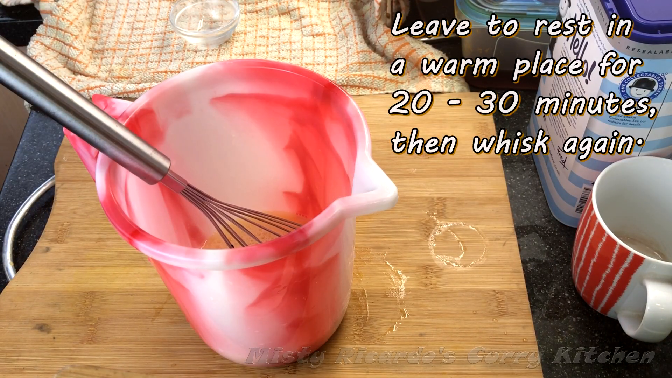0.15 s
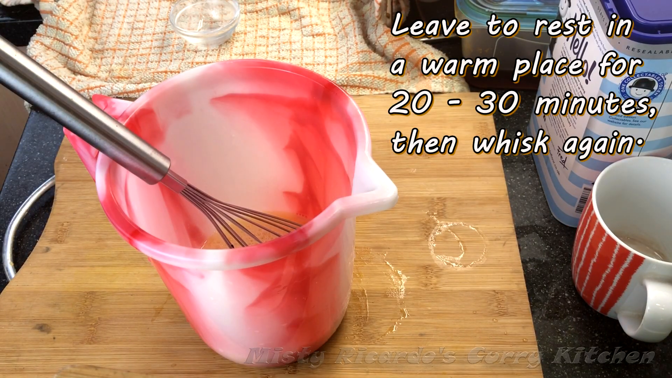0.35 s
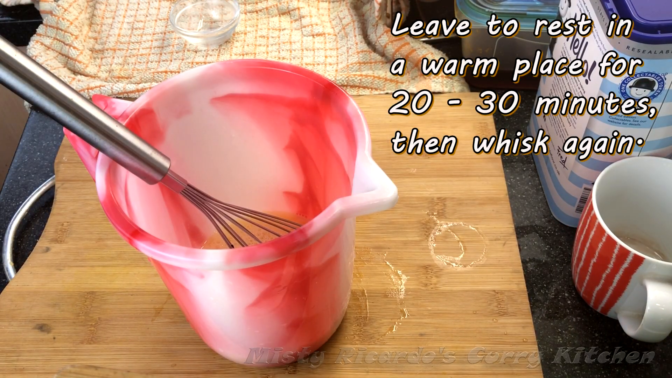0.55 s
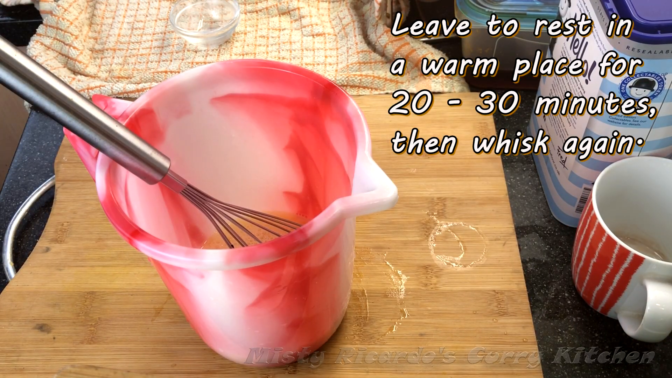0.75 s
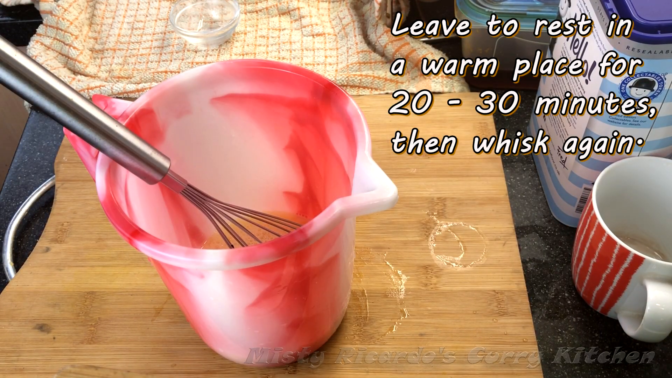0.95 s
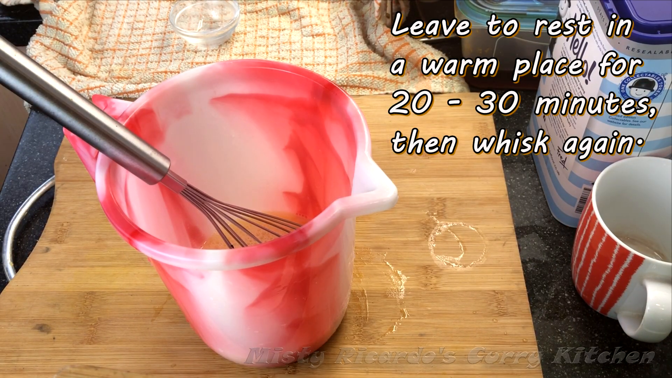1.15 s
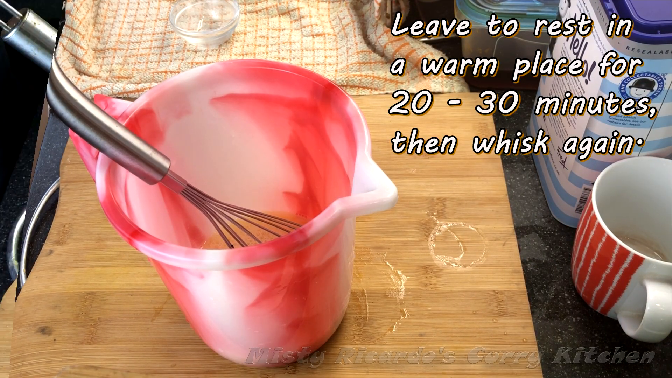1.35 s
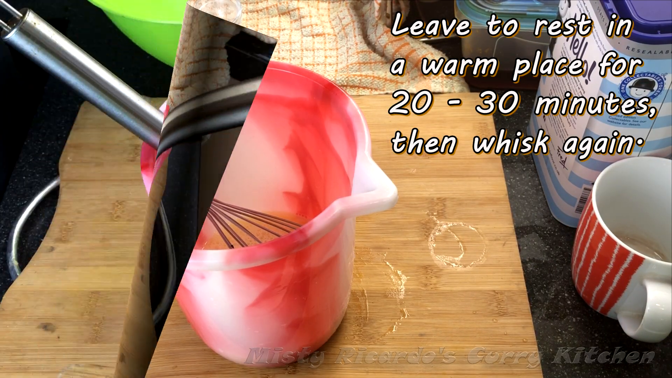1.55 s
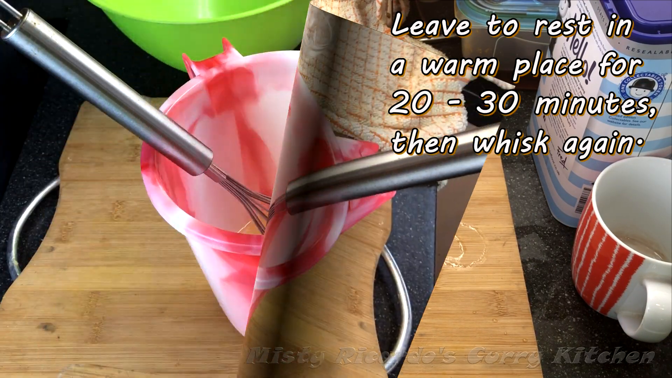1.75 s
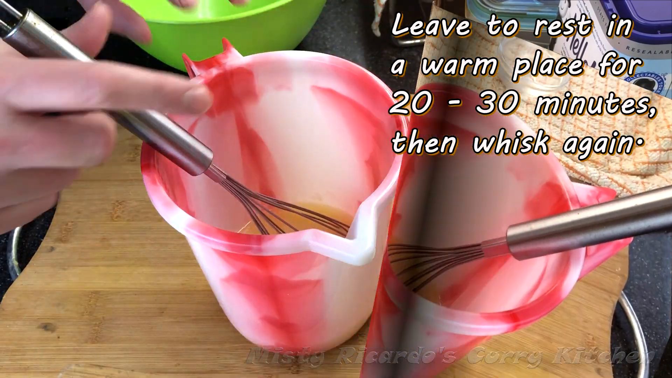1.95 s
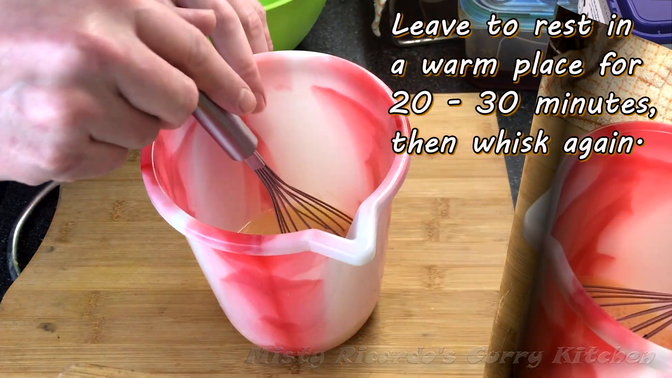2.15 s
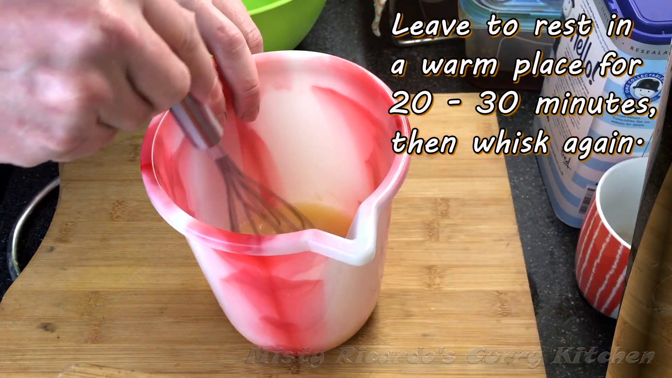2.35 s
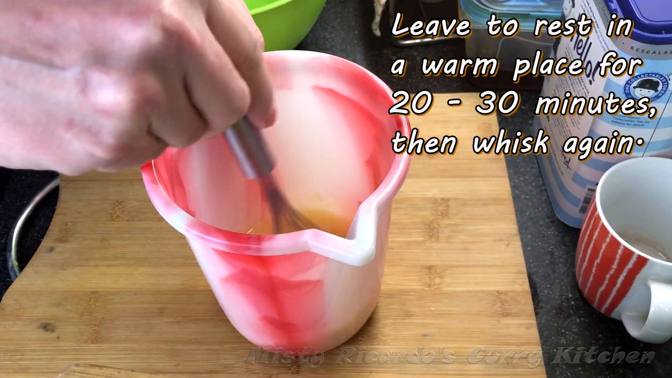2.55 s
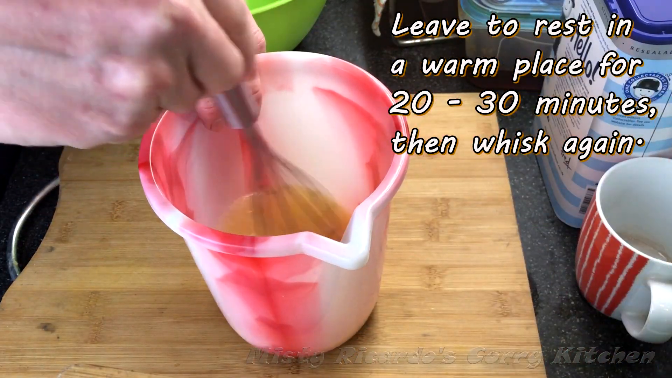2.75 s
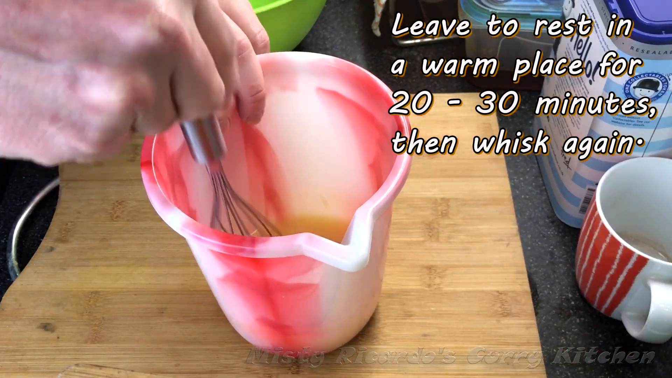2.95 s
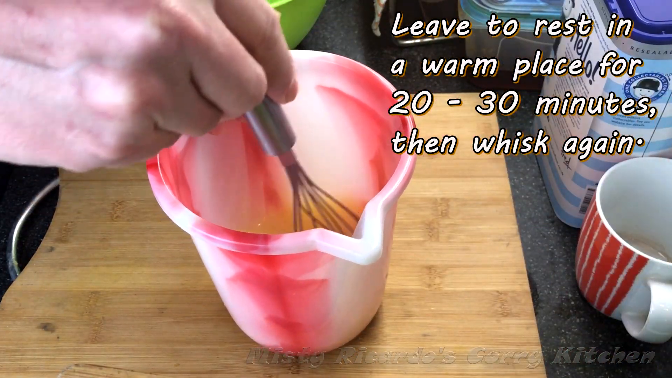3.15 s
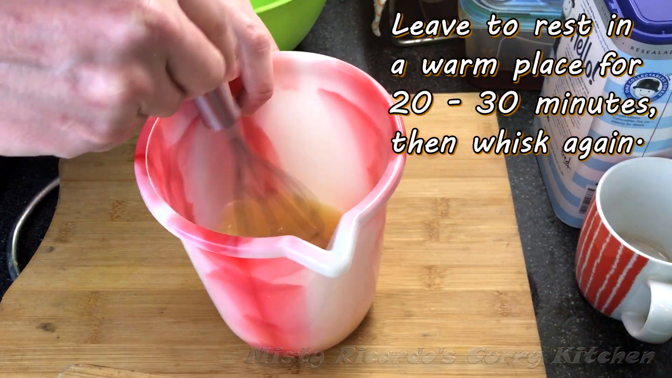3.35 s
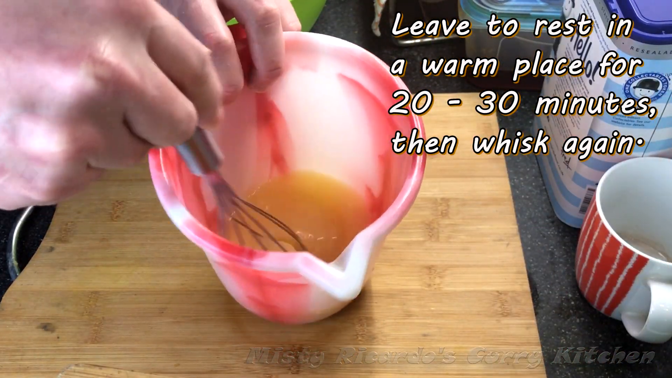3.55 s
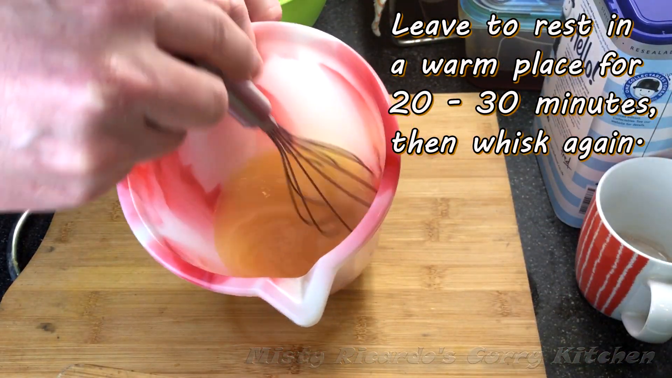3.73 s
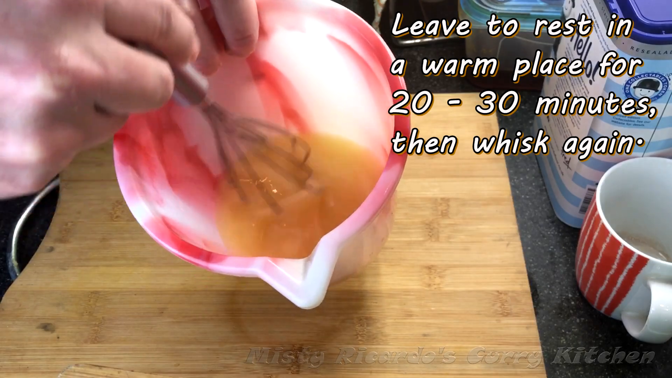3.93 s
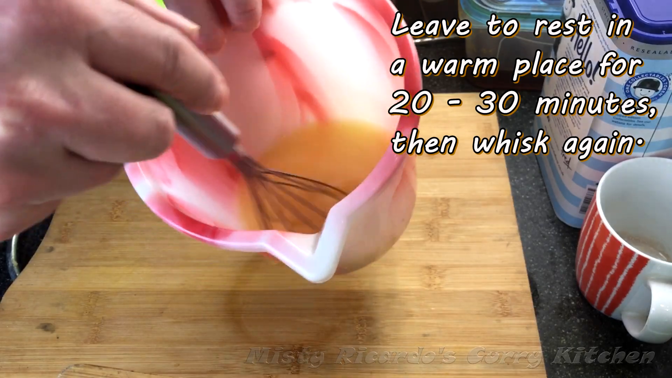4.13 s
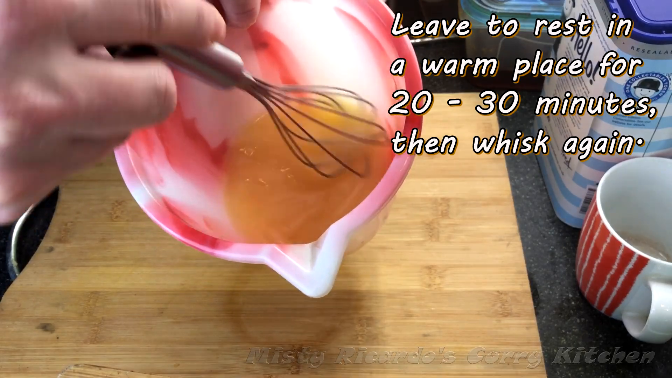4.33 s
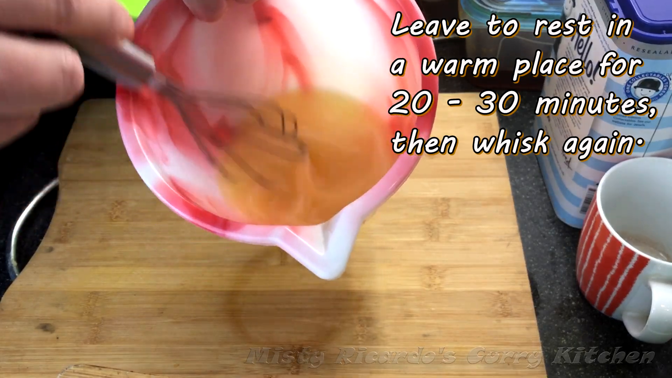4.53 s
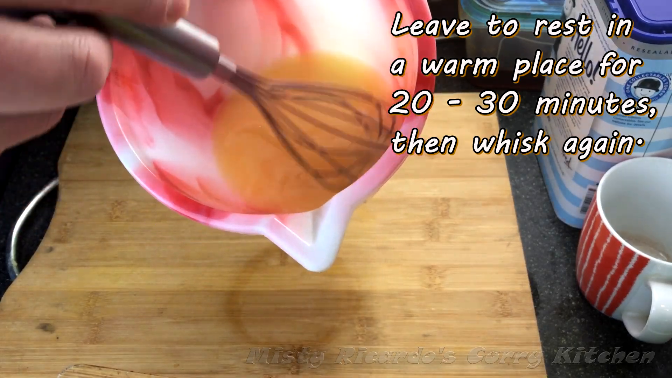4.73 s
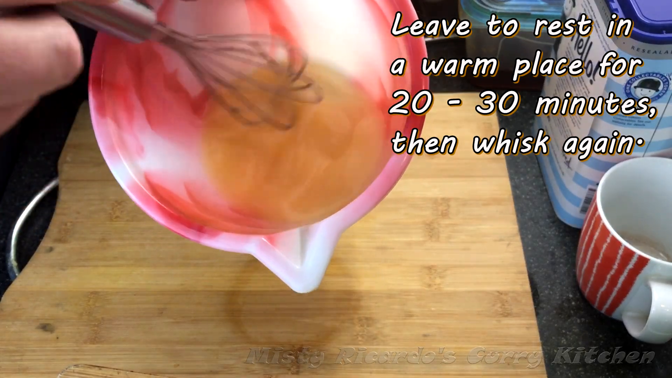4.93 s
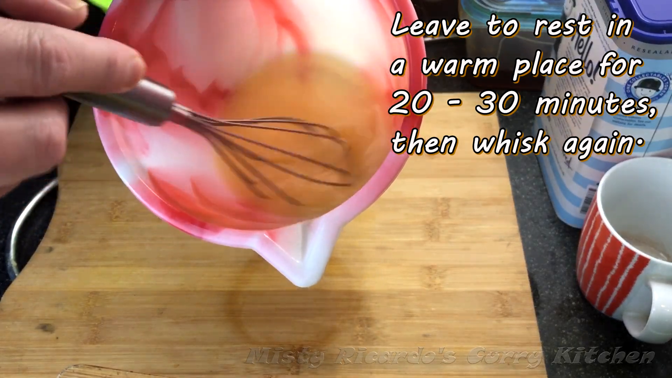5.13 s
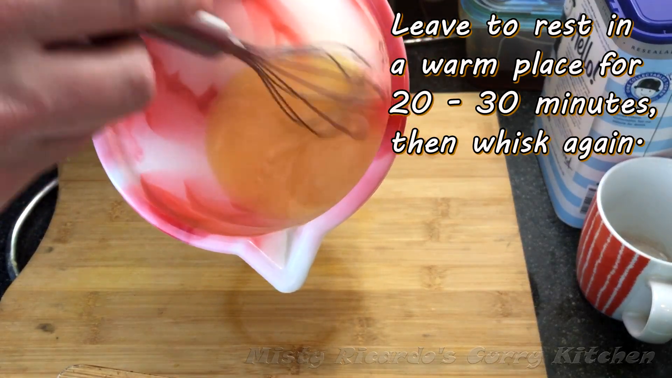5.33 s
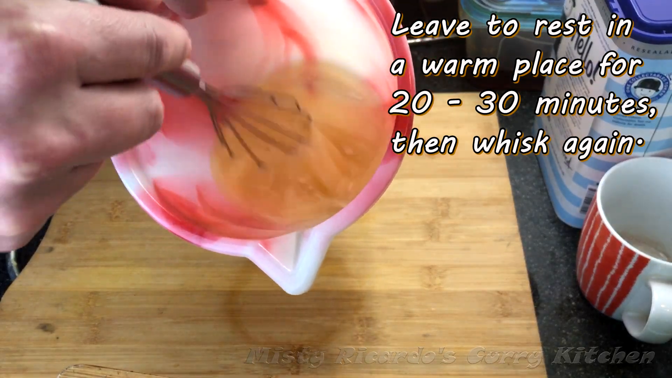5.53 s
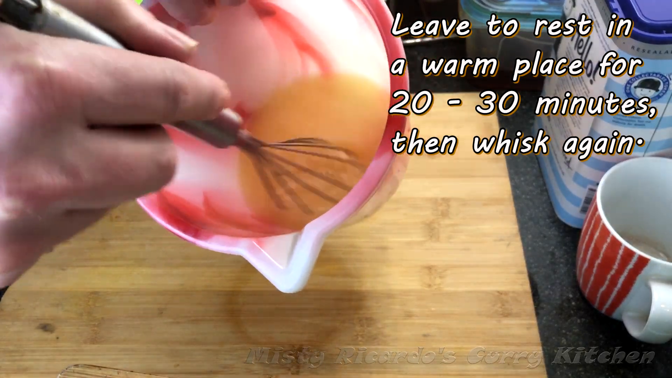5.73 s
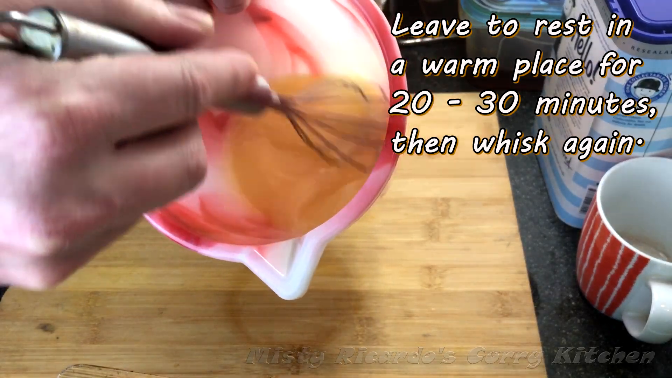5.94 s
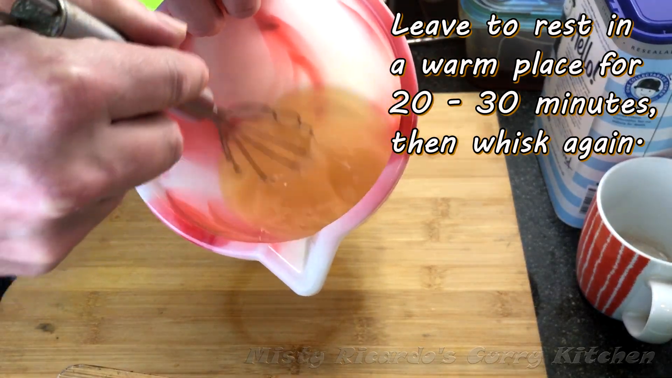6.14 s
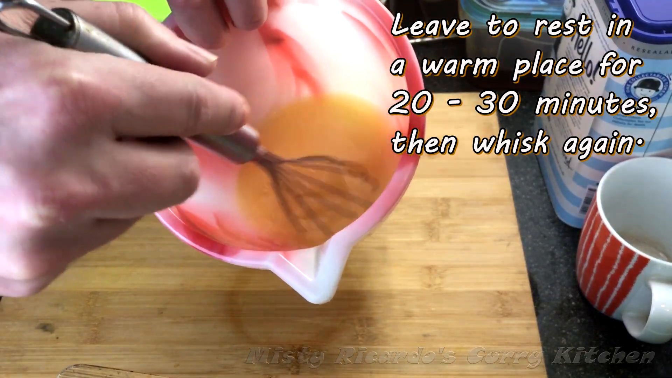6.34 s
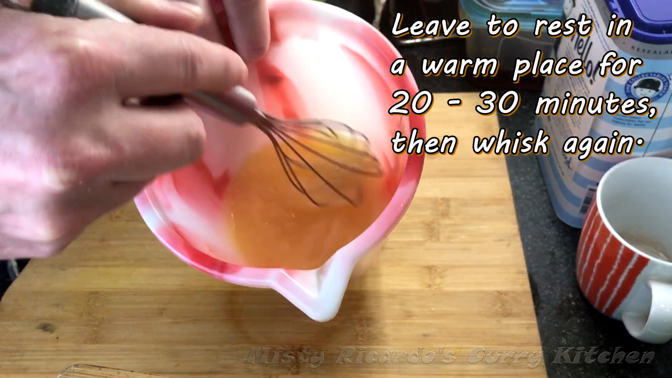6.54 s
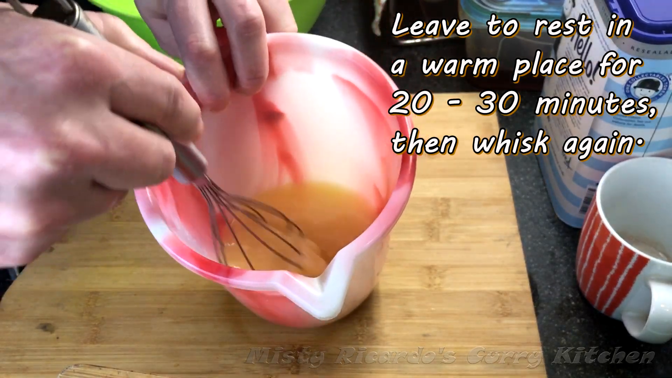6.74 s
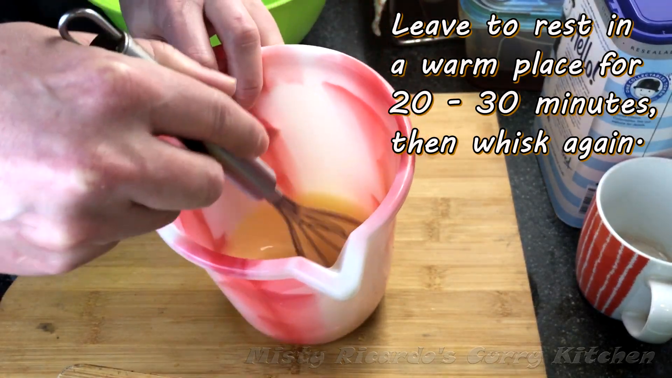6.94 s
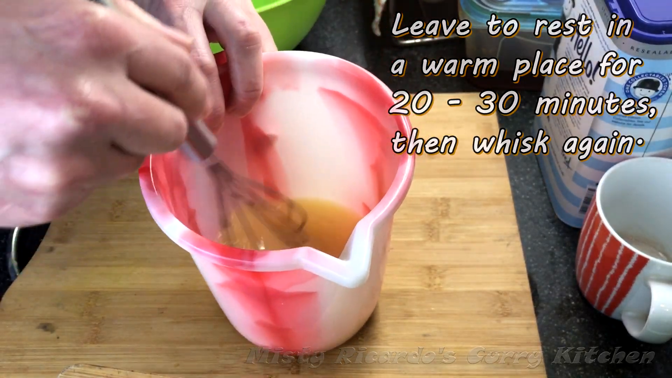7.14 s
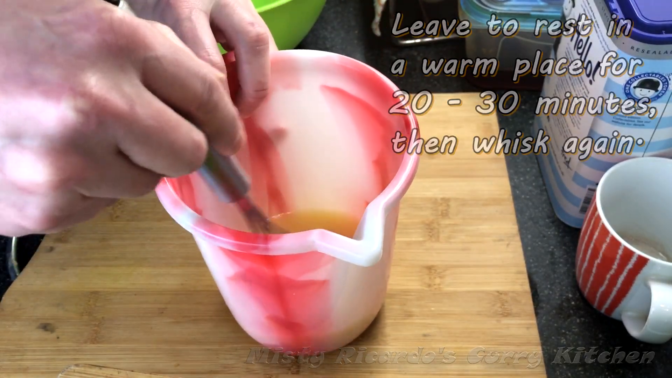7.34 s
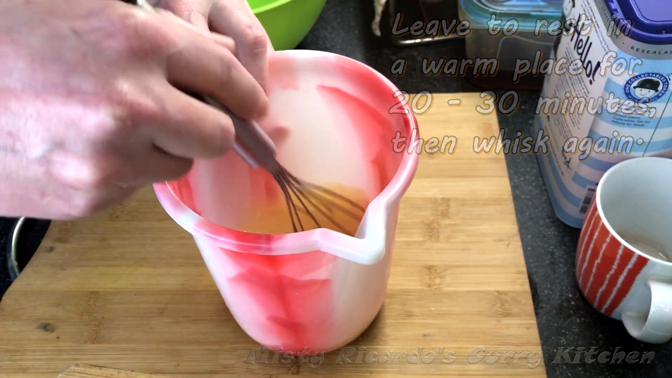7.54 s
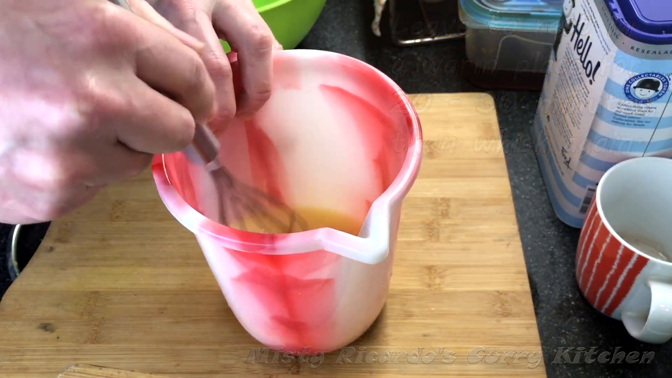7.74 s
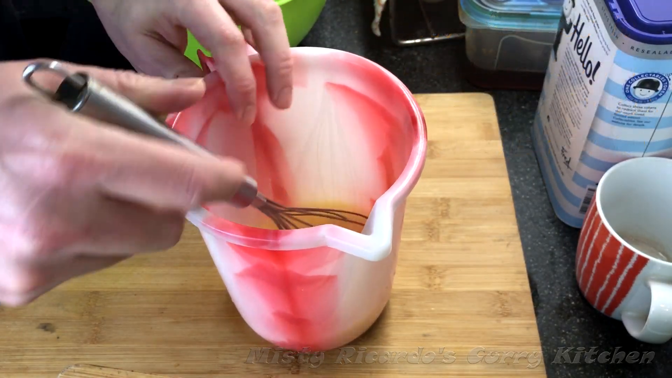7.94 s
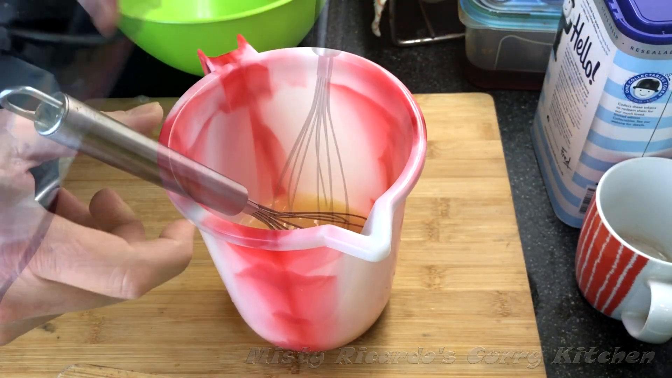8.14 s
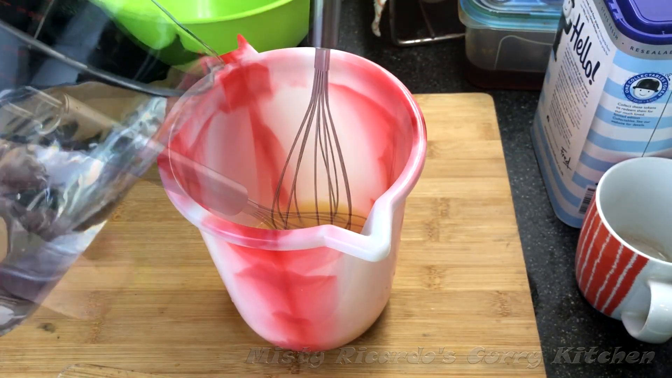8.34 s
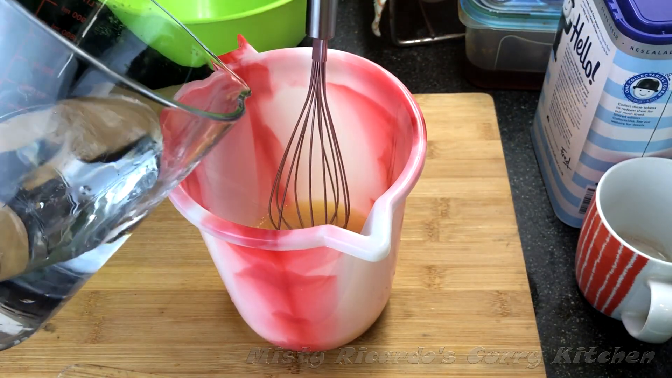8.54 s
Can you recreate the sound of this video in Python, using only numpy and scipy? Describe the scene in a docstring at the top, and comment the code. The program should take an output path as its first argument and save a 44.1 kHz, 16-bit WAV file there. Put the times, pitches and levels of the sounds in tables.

```python
"""A steel whisk beats a little liquid in a plastic jug: wires clack and chatter on the wall as noise bursts,
then swish on as gritty noise, and both set the jug's resonances ringing. Bubbles froth and gulp.
The tilted jug bumps back onto a wooden board and the whisk's handle drops on the rim, as damped modes.
The room hums softly in narrow noise, and echoes in decaying noise tails."""
import sys
import numpy as np
from scipy import signal
from scipy.fft import rfft, irfft, next_fast_len
from scipy.io import wavfile
from scipy.ndimage import uniform_filter1d, map_coordinates

SR = 44100
rng = np.random.default_rng(int(sys.argv[2]) if len(sys.argv) > 2 else 0)


def log_audio(samples):
    """Write samples as a 16-bit WAV file to the path given in sys.argv[1]."""
    # one column per channel
    frames = np.atleast_2d(samples).T
    # limit to full scale, then quantise
    limited = np.clip(frames, -1, 1)
    pcm = np.round(limited * 32767).astype(np.int16)
    wavfile.write(sys.argv[1], SR, pcm)


N = 378378

# Colour of wire on plastic, also lent to the rustle. Each row: frequency in Hz, relative density in dB per Hz.
WIRE_COLOUR = [(45, -29.5), (150, -21), (350, -28), (750, -7.5), (1100, -10), (1450, -5.5), (2200, -1),
               (3000, 2), (4300, 1.5), (5200, -5.5), (7200, -9.5), (9000, -16), (12000, -21.5),
               (15500, -25.5)]
# The whisk's hits on the wall, heavy ones and lighter grazes; the last row is a faint separate tick after
# the handle has dropped. Each row: start in seconds, mean level of its wires in dB, sweep from first to
# last wire in seconds, swell over the sweep in dB, tilt in dB per octave.
BLOWS = [(2.073, -68.5, 0, 11, -6), (2.107, -75, 0.0013, 6, -6), (2.392, -55, 0.016, 7, 1),
         (2.481, -45.5, 0, 0, 2), (2.501, -40.5, 0.0019, 0, -1), (2.636, -51, 0.013, -6, -4),
         (2.676, -41.5, 0, 0, -2.5), (2.731, -37, 0.031, 3.5, -3), (2.849, -38, 0.0048, 0, -2),
         (2.949, -43.5, 0, 0, -2), (2.996, -43, 0.016, 0, -5.5), (3.032, -34.5, .025, 6.5, 1),
         (3.131, -32, 0.0052, 11.5, 1.5), (3.179, -44.5, 0.00036, -8, -2.5), (3.326, -36.5, 0.0085, 8, 1),
         (3.354, -40.5, 0.0097, 2, -4), (3.381, -34, 0.0028, -7, 0.5), (3.458, -33.5, 0.0081, -6, -1),
         (3.6, -49, 0, 6, 2), (3.67, -32.5, 0.008, 3.5, -3.5), (3.762, -30.5, 0.0058, -2, 5),
         (3.864, -40, 0, 0, -3), (3.898, -47, 0.0022, 2, -5), (3.976, -31, 0.024, 3.5, -0.5),
         (4.064, -34.5, 0.009, 6, 2.5), (4.166, -42, 0, 0, -1.5), (4.217, -38, 0, 0, -8),
         (4.289, -40, 0.0023, 13, -3), (4.314, -32, 0.0073, -1, 2), (4.373, -35, 0.014, 1, 3.5),
         (4.521, -49, 0, 0, -2.5), (4.6, -32.5, 0.043, 1.5, 0), (4.704, -36, 0.021, 1, 5),
         (4.798, -41.5, 0.021, -2.5, 2), (4.895, -42, 0.0035, -4, -5.5), (4.945, -31, 0.035, 0, 0),
         (5.047, -37, 0.018, -5.5, 2), (5.129, -50, 0.0022, -3, 7), (5.177, -42.5, 0, 0, -5),
         (5.222, -51.5, 0.00052, 0, -11), (5.278, -30, 0.031, 1, 1.5), (5.375, -32, 0.0053, 9.5, 3),
         (5.428, -40.5, 0.0011, -4, -0.5), (5.469, -39.5, 0, 0, -5.5), (5.576, -42, 0.0078, -2, -6),
         (5.643, -24.5, 0, 0, 3), (5.694, -30.5, 0.0042, 8.5, 3), (5.739, -36.5, 0, 0, -1),
         (5.913, -38.5, 0, 0, -1.5), (5.934, -33.5, 0, 0, -0.5), (5.991, -27.5, 0.0086, -2, 2.5),
         (6.19, -49.5, 0, 0, -6.5), (6.254, -27.5, 0.00026, -7, 3.5), (6.308, -28.5, 0.0068, 2, 2.5),
         (6.527, -47.5, 0.00031, 3, 0), (6.558, -30, 0, 2.5, 2), (6.614, -31, 0.0073, 4.5, 8.5),
         (6.853, -31, 0.014, 5.5, 0.5), (6.942, -38.5, 0.0083, 9.5, -0.5), (7.183, -43.5, .014, 7, -2.5),
         (7.221, -35, 0.00041, 0, 3), (7.286, -39, 0.00027, -9.5, -3.5), (7.504, -39.5, 0.037, 9.5, -1.5),
         (7.613, -37, 0.0048, 7, -1), (7.816, -40, 0.017, 3, -4.5), (7.899, -38.5, .013, 8, -2.5),
         (8.435, -66.5, 0, -3.5, -3)]


def amp(db):
    """Decibels to amplitude."""
    return 10 ** (np.asarray(db) / 20)


def unit(x):
    """x scaled to an rms of 1."""
    return x / np.sqrt(np.mean(x ** 2) + 1e-20)


def along(points, hz):
    """Values between (Hz, value) points, on a log frequency axis."""
    point_hz, values = np.transpose(points)
    return np.interp(np.log(hz + 1), np.log(point_hz + 1), values)


def curve(rows):
    """(seconds, value) rows as one value per sample."""
    return np.interp(np.arange(N) / SR, *np.transpose(rows))


def wobble(rate):
    """A smooth random curve with rate knots a second."""
    knots = rng.standard_normal(int(N * rate / SR) + 4)
    return map_coordinates(knots, [np.arange(N) * rate / SR])


def fade(t, t60):
    """Exponential decay, 60 dB down after t60 seconds."""
    return np.exp(-np.log(1000) * np.minimum(t / t60, 10))


def add(track, s, sound):
    """Mix a sound into the track at s seconds."""
    part = track[round(s * SR):][:len(sound)]
    part += sound[:len(part)]


def filtered(x, response):
    """x times a response of frequency, padded so that rings can die out."""
    size = next_fast_len(N + SR // 2)
    return irfft(rfft(x, size) * response(np.fft.rfftfreq(size, 1 / SR)), size)[:N]


def coloured(x, points, tilt=0, ripple_db=0, size=1024):
    """x through a minimum-phase colour: treble tilt in dB per octave, plus a ripple of random broad modes."""
    hz = np.fft.rfftfreq(size, 1 / SR)
    ripple = map_coordinates(rng.standard_normal(size // 8), [np.sqrt(hz) / 3])
    ripple = np.minimum(ripple, 1.5) / np.hypot(1, hz / 6000)  # peaks limited, flatter in the treble
    slope = tilt * np.log2(np.clip(hz, 2000, 10000) / 2000)
    gain = unit(amp(along(points, hz) + slope + ripple_db * ripple))
    cepstrum = irfft(np.log(gain + 1e-6))
    cepstrum[1:size // 2] *= 2  # folding the cepstrum makes the filter causal
    cepstrum[size // 2 + 1:] = 0
    impulse = irfft(np.exp(rfft(cepstrum)))
    return signal.fftconvolve(x, impulse)[:len(x)]


def resonate(x, modes):
    """x through parallel resonances of (Hz, width in Hz, peak gain in dB)."""
    def response(f):
        return sum(amp(db) * 1j * f * width / (hz * hz - f * f + 1j * f * width) for hz, width, db in modes)
    return filtered(x, response)


def background():
    """Room air, a fluttering low appliance hum of narrow noise, and a little rustle of handling."""
    # Spectrum of the air. Each row: frequency in Hz, relative density in dB per Hz.
    air_colour = [(18, -89), (30, -39.5), (90, -13.5), (130, -15.5), (164, -3), (270, -29.5), (315, -18.5),
                  (350, -26.5), (532, -28.5), (622, -30), (787, -31), (1170, -26), (1910, -39),
                  (3500, -43.8), (15500, -54)]
    # Soft rustle of handling. Each row: time in seconds, level in dB.
    rustle_level = [(2.0, -105), (2.17, -76.5), (2.4, -79), (8.2, -77), (8.58, -96)]
    air = unit(filtered(rng.standard_normal(N), lambda hz: amp(along(air_colour, hz))))
    hum = resonate(rng.standard_normal(N), [(158.6, 4.7, 0)])
    hum = unit(resonate(hum, [(161.4, 3.7, 0)]))  # two narrow bands in series
    rustle = amp(curve(rustle_level)) * coloured(rng.standard_normal(N), WIRE_COLOUR, tilt=-2.5)
    return amp(-68.0) * air + amp(-76) * hum + rustle


def grains(size, rate, smooth):
    """Tiny random impacts, rate a second, over a share of smooth noise; rms 1."""
    impacts = rng.standard_normal(size) * (rng.random(size) < rate / SR)
    return unit(unit(impacts) + smooth * rng.standard_normal(size))


def volley(t, delays, gains, t60, attack):
    """Joint envelope of several impacts that rise and die alike, summed in power."""
    age = np.maximum(t - delays[:, None], 0)
    shapes = fade(age, t60) * (1 - np.exp(-age / attack))
    return np.linalg.norm(gains[:, None] * shapes, axis=0)


def strikes(blows, count=6):
    """Wires land one after another, tick and chatter; each blow has its own colour. Gives plain and coloured."""
    wire_gap_s = 0.016  # widest nominal gap between wires, until all count wires are in use
    wire_slip_s, wire_scatter_db = 0.00077, 1.24  # wires unevenly spaced and unevenly stiff
    chatter_db, chatter_t60_s = -16, 0.055  # each wire buzzes on the wall
    tick_db, tick_t60_s = -15.5, 0.0024  # after a hard first touch
    force, clack, t = np.zeros(N), np.zeros(N), np.arange(SR // 10) / SR
    for s, db, sweep, swell_db, tilt in blows:
        wires = min(1 + int(np.ceil(abs(sweep) / wire_gap_s)), count)
        place = np.linspace(0, 1, wires)
        slip, stiffness = rng.standard_normal((2, count))[:, :wires]
        delays = place * (abs(sweep) + wire_slip_s * slip)
        wire_db = swell_db * place + wire_scatter_db * stiffness
        gains = amp(db + wire_db - wire_db.mean())

        lumps = amp(2.07 * map_coordinates(rng.standard_normal(len(t) // 100), [t * 350]))
        chatter_shape = volley(t, delays, gains, chatter_t60_s, attack=0.0018)
        chatter = grains(len(t), rate=2500, smooth=0.72) * lumps * chatter_shape
        tick = rng.standard_normal(len(t)) * volley(t, delays, gains, tick_t60_s, attack=0.00005)
        snap = tick - 0.45 * np.roll(tick, 1)  # hard steel favours the treble
        blow = np.linalg.norm(gains) * (amp(chatter_db) * unit(chatter) + amp(tick_db) * unit(snap))
        add(force, s, blow)
        add(clack, s, coloured(blow, WIRE_COLOUR, tilt, ripple_db=4.5))
    return force, clack


def drag_strength():
    """How hard the wires drag: stirring plus a dying swish after every blow, summed in power."""
    # Wires stirring along the bottom, apart from the blows. Each row: time in seconds, level in dB.
    stir_level = [(2.1, -110), (2.27, -67.5), (2.4, -58), (2.75, -66), (3.0, -74), (3.3, -69.5), (3.7, -60),
                  (4.2, -64.5), (4.55, -69), (5.1, -62), (5.3, -75.5), (6.82, -90.5), (7.04, -62.5),
                  (7.4, -68), (7.7, -56.5), (8.0, -81), (8.15, -110)]
    firm_db, swish_db = -29, -55  # a blow of firm_db swishes at swish_db; softer blows swish less
    rise_s, t60_s = 0.016, 0.54
    power, t = amp(curve(stir_level)) ** 2, np.arange(SR // 2) / SR
    swish = fade(t, t60_s) * (1 - np.exp(-t / rise_s))
    for s, db, *_ in BLOWS:
        add(power, s, (amp(swish_db + db - firm_db) * swish) ** 2)
    return np.sqrt(power)


def strays(strength, count=64):
    """Light flicks of single wires at random moments, as strong as the drag allows; rows like BLOWS."""
    # Start and end of the whisking, in seconds.
    whisking_s = (2.28, 7.95)
    shares = (np.arange(count) + rng.random(count)) / count  # one flick in each equal slot
    times = np.interp(shares, [0, 1], whisking_s)
    levels = 20 * np.log10(strength[(times * SR).astype(int)]) + 7.5  # dB over the drag
    return [(s, db, 0, 0, -1.5) for s, db in zip(times, levels)]


def patchy(x, depth_db):
    """x with narrow resonances that come and go; rms 1."""
    z = signal.stft(x, nperseg=512)[2]
    field = uniform_filter1d(rng.standard_normal(z.shape), size=4, axis=0)  # across frequency
    field = uniform_filter1d(field, size=8, axis=1)  # across time
    return unit(signal.istft(z * amp(depth_db * unit(field)), nperseg=512)[1][:N])


def bubble(hz):
    """An air pocket rings with a rising pitch, 60 dB down after about fifteen cycles."""
    t = np.arange(int(SR * 15 / hz)) / SR
    return np.sin(2 * np.pi * hz * (t + 0.74 * t ** 2)) * fade(t, 15 / hz) * (1 - np.exp(-t * hz))


def froth(count=1300):
    """Small bubbles of many sizes beaten into the liquid; rms 1."""
    out = np.zeros(N)
    for s, pitch, size in rng.random((count, 3)):
        add(out, s * N / SR, amp(10 * size) * bubble(280 * 9 ** pitch))
    return unit(out)


def whisk():
    """Strikes and the gritty drag of the wires both set the jug ringing."""
    # The jug's wall and cavity. Each row: frequency in Hz, width in Hz, relative gain in dB.
    jug_modes = [(319.8, 9.6, 7.5), (460.3, 20, 0.5), (487, 21.4, 2), (660, 12, -5.5), (1460, 37, -20.5),
                 (2100, 58, 1.5), (2751, 37, 4), (3170, 42, -1.5), (4340, 30, -5.5)]
    # Cross mode of the air in the jug. Each row: frequency in Hz, width in Hz, relative gain in dB.
    cavity_modes = [(1718, 48.5, 0.5)]
    # The cross mode is strongest while the jug stands upright. Each row: time in seconds, drive in dB.
    upright_drive = [(2.3, 19.5), (4.1, 16.5), (4.7, 4), (6.2, 12.5), (6.9, 18), (7.9, 20)]
    # Broad, hollow resonance of the lifted, tilted jug. Each row: frequency in Hz, width in Hz, gain in dB.
    hollow_modes = [(1180, 300, 1.5)]
    # How far the jug is tilted. Each row: time in seconds, share from 0 to 1.
    tilted_share = [(4.1, 0), (4.6, 0.6), (6.4, 1), (6.9, 0.1)]
    judder_db, judder_per_s = 5, 64  # the dragging wires catch and slip: depth, random knots a second
    froth_db = -9.5  # relative to the drag strength

    strength = drag_strength()
    force, clack = strikes(BLOWS + strays(strength))
    grit = patchy(grains(N, rate=900, smooth=0.5), depth_db=3.5)
    drag = strength * amp(0.5 + judder_db * wobble(judder_per_s)) * grit
    jug = amp(1.5) * resonate(force + 2.17 * drag, jug_modes)
    cavity = resonate((force + 0.84 * drag) * amp(curve(upright_drive)), cavity_modes)
    hollow = resonate(clack * curve(tilted_share), hollow_modes)
    swish = coloured(drag, WIRE_COLOUR, tilt=-3.5)
    return clack + swish + jug + cavity + hollow + amp(froth_db) * strength * froth()


def liquid(count=12):
    """Each gulp is a quick cluster of large bubbles of scattered pitch."""
    # The liquid gulps. Each row: start in seconds, level in dB (each bubble is 8.5 dB lower), centre pitch in Hz.
    gulps = [(3.52, -41, 523), (5.582, -40, 352), (7.661, -45.5, 418)]
    out = np.zeros(N)
    for s, db, hz in gulps:
        for _ in range(count):
            start = s + 0.067 * rng.random()
            pitch = hz * np.exp(rng.normal(0, 0.086))
            add(out, start, amp(db - 8.5) * bubble(pitch))
    return out


def ring(modes, t, attack):
    """Damped modes of (Hz, dB, t60 in seconds), at new strengths for each blow."""
    partials = sum(amp(db + rng.normal(0, 1)) * fade(t, t60) * np.sin(2 * np.pi * hz * t)
                   for hz, db, t60 in modes)
    return partials * (1 - np.exp(-t / attack))


def knocks():
    """Dull bumps of the jug ring the board; the handle's hard knock on the rim adds a noisy crack."""
    # The jug's base bumps the board. Each row: start in seconds, level in dB.
    bumps = [(6.888, -44), (7.199, -56), (7.7, -64), (7.921, -51.5), (8.099, -55)]
    # The board under the jug. Each row: frequency in Hz, mean relative level in dB, t60 in seconds.
    board_modes = [(90, 0, 0.19), (125, 2, 0.16), (144.5, 3.5, 0.13), (340, 6.5, 0.068), (502, 12.5, 0.035)]
    # The handle lands on the rim: start in seconds, level in dB.
    drop_s, drop_db = (8.0775, -35)
    # Handle and rim together. Each row: frequency in Hz, mean relative level in dB, t60 in seconds.
    handle_modes = [(341, -6, 0.058), (556, -7.5, 0.07), (614, -6.5, 0.13), (1310, -18, 0.13)]
    # The knock's noisy body. Each row: frequency in Hz, relative density in dB per Hz.
    thud_colour = [(120, -39), (330, -5), (600, -6), (850, -12), (3800, -5.5), (6000, -24), (15000, -36.5)]
    out, t = np.zeros(N), np.arange(SR // 3) / SR
    for s, db in bumps:
        add(out, s, amp(db) * ring(board_modes, t, attack=0.0056))
    crack = coloured(rng.standard_normal(len(t)) * fade(t, 0.03), thud_colour)
    add(out, drop_s, amp(drop_db) * (ring(handle_modes, t, attack=0.00094) + 2.06 * crack))
    return out


def kitchen(x, count=12):
    """Diffuse echo of the walls, in noise tails that crossfade as the hand and jug move."""
    # The kitchen's echo. Each row: frequency in Hz, t60 in seconds.
    echo_t60 = [(150, 0.28), (1000, 0.38), (4000, 0.19), (8000, 0.22), (15000, 0.19)]
    out, position = np.zeros(N), np.linspace(0, count - 1, N)
    for k in range(count):
        hz, t, z = signal.stft(rng.standard_normal(SR // 2), SR, nperseg=256)
        decay = fade(t, along(echo_t60, hz)[:, None]) * (1 - np.exp(-t / 0.0009))
        tail = signal.istft(z * decay, SR, nperseg=256)[1]
        near = np.flatnonzero(abs(position - k) < 1)
        part = x[near] * np.sqrt(1 - abs(position[near] - k))  # equal-power crossfade
        add(out, near[0] / SR, signal.fftconvolve(part, tail / np.linalg.norm(tail)))
    return out


def scene():
    """Whisk, liquid and knocks, with their echo, over the room's background."""
    close = whisk() + liquid() + knocks()
    return (close + amp(-11.0) * kitchen(close) + background())[None]


def record(dry):
    """The microphone drops the deepest bass and keeps next to nothing above its band limit."""
    low_hz, top_hz = 32, 16000

    def band(hz):
        bass_cut = hz ** 2 / np.hypot(hz ** 2, low_hz ** 2)
        return bass_cut / np.sqrt(1 + (hz / top_hz) ** 160)
    return filtered(dry[0], band)[None]


dry = scene()
out = record(dry)
log_audio(out)
```